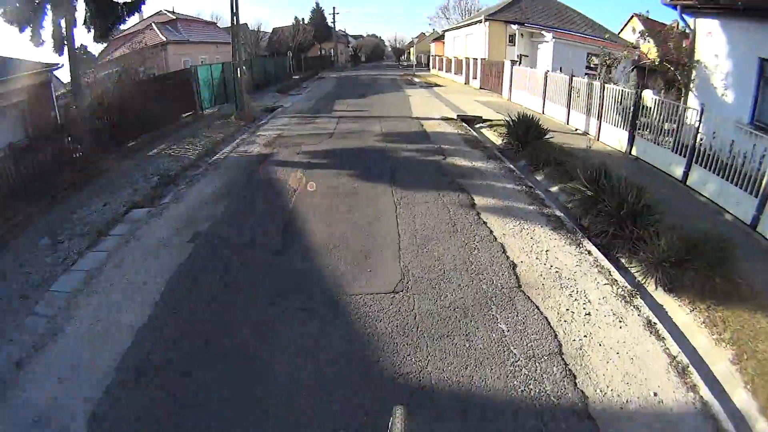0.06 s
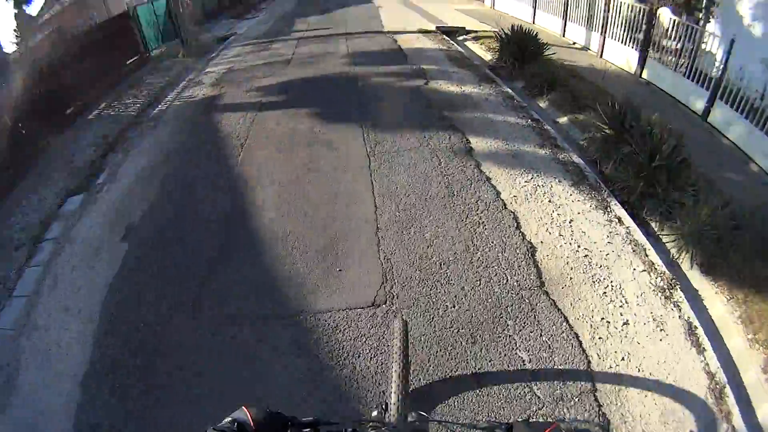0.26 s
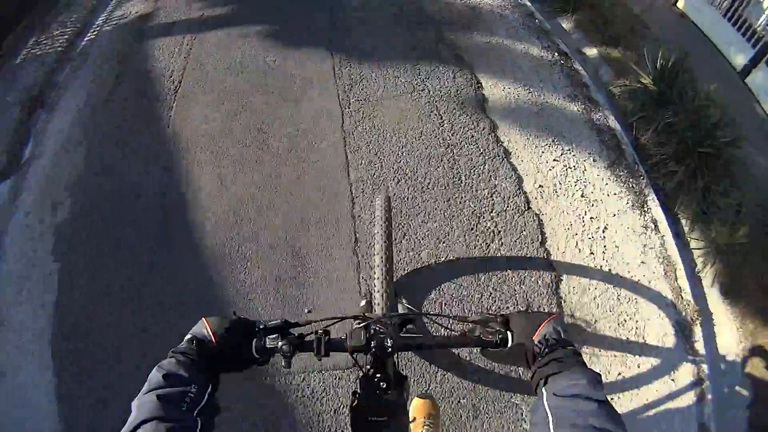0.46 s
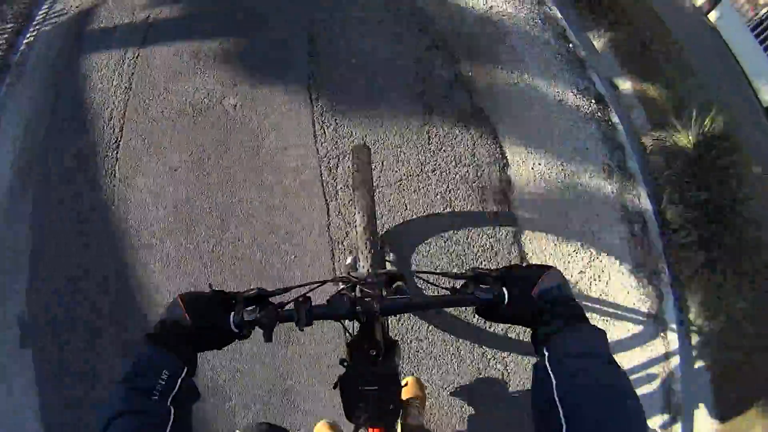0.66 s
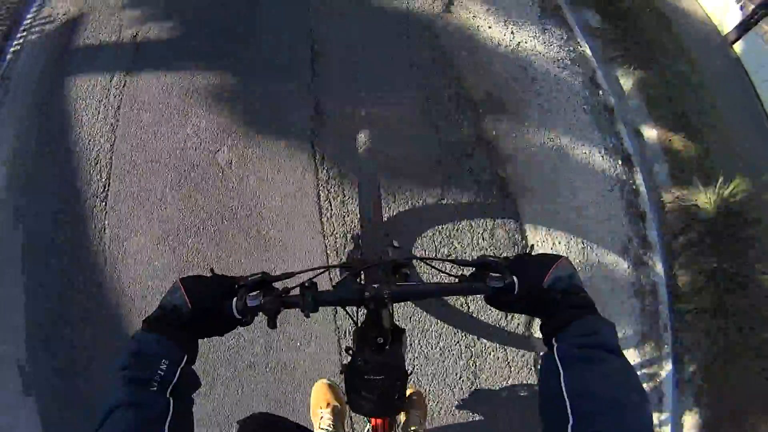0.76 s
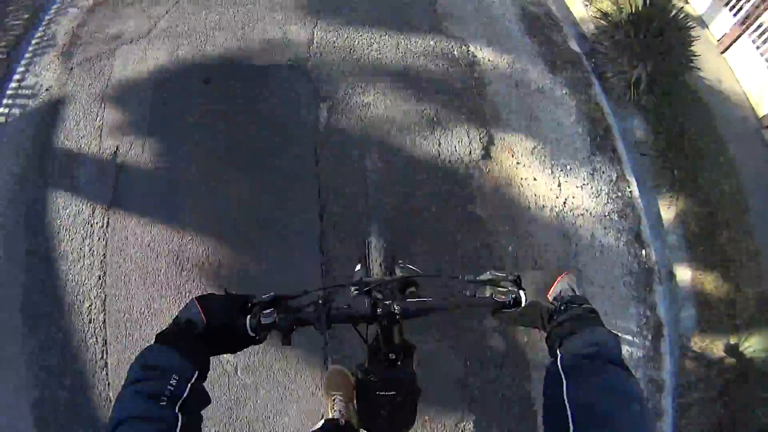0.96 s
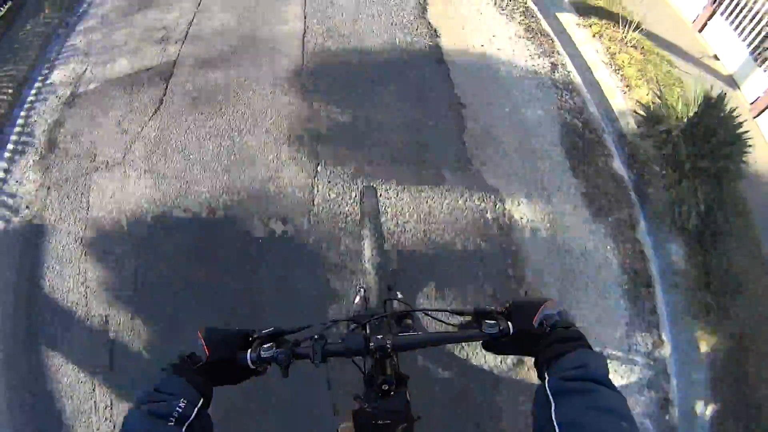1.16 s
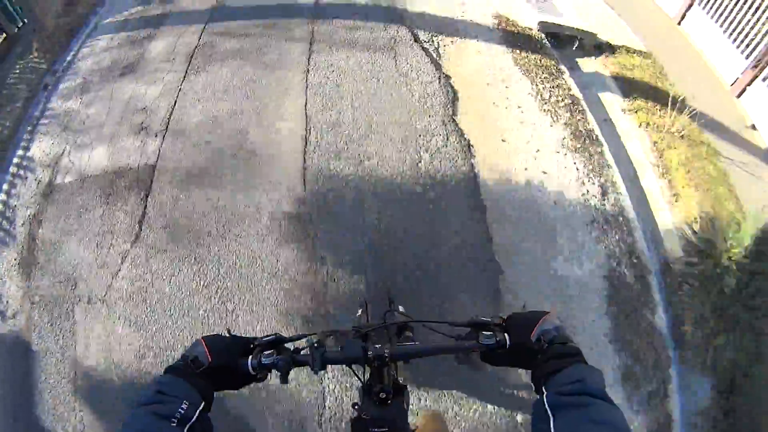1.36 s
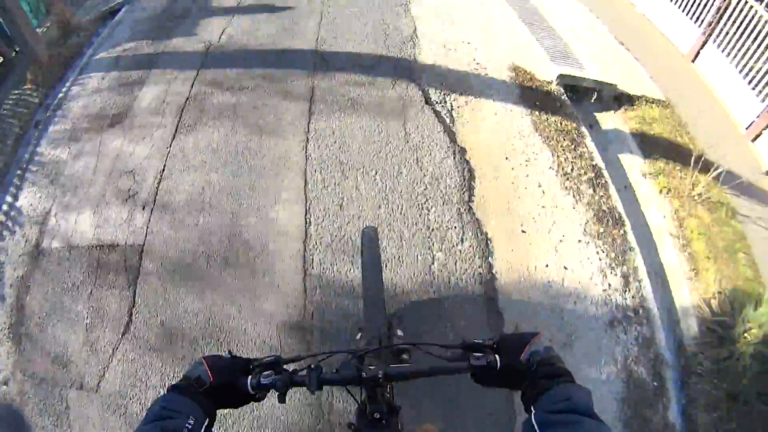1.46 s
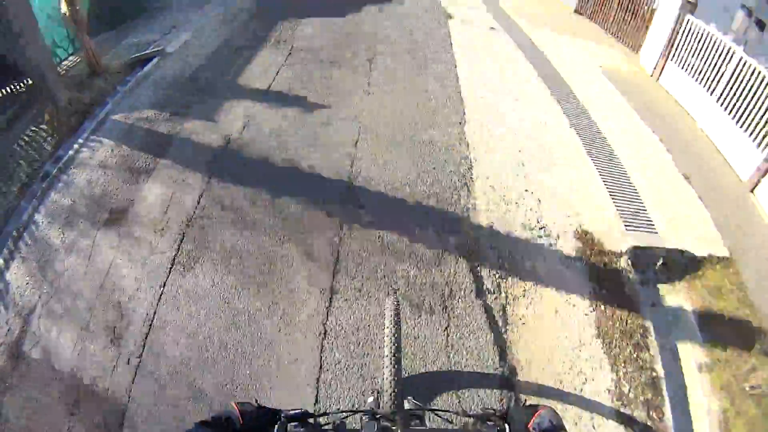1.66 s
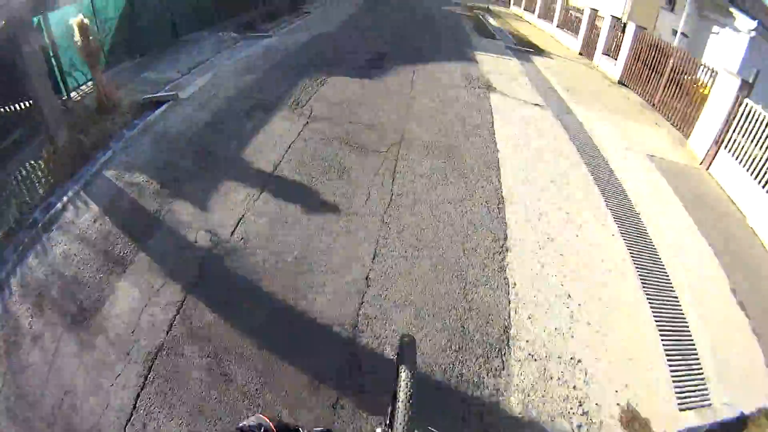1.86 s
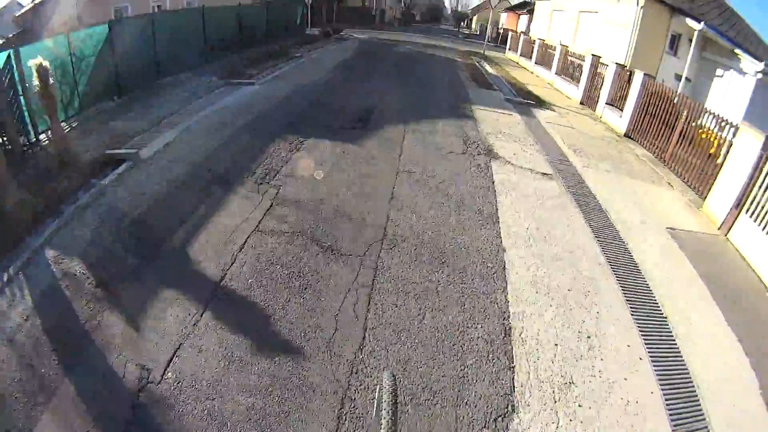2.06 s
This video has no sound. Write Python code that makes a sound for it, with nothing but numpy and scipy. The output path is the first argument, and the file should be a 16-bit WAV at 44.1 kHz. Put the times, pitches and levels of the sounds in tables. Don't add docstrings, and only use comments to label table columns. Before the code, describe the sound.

Bicycle tyres roll on asphalt with grainy hiss, heard from a helmet camera; loud mount rubbing and squeaks at first, then quieter road grit and stone ticks, and a sudden harsh crunch at the end.

```python
import sys
import numpy as np
from scipy import signal
from scipy.fft import rfft, irfft, next_fast_len
from scipy.io import wavfile
from scipy.ndimage import uniform_filter1d

SR = 44100
rng = np.random.default_rng(int(sys.argv[2]) if len(sys.argv) > 2 else 0)


def bounce(signal):
    frames = np.transpose(np.atleast_2d(signal))
    limited = np.clip(frames, -1, 1)
    pcm = np.round(limited * 32767).astype(np.int16)
    wavfile.write(sys.argv[1], SR, pcm)


def linear_from_db(decibels):
    return 10 ** (np.asarray(decibels, float) / 20)


N = 92301

# f/Hz, width/Hz, level/dB
PADDING_MODES = [(1020, 560, -11), (1513, 425, -0.5), (2434, 650, -1), (3224, 280, -14.5),
                 (5130, 1200, -5.5), (7000, 2030, -15)]
# f/Hz, width/Hz, level/dB
HOUSING_MODES = [(1390, 450, -10.5), (3020, 880, -1), (3394, 1300, -4.5), (5060, 1200, -9),
                 (7000, 3200, -14), (9000, 7800, -15)]


def level(x, db):
    return x * linear_from_db(db) / np.sqrt(np.mean(x ** 2))


def curve(table, column=1):
    rows = np.array(table)
    return np.interp(np.arange(N) / SR, rows[:, 0], rows[:, column])


def spectrum(table, hz, column=1):
    rows = np.array(table)
    return np.interp(np.log(hz), np.log(rows[:, 0]), rows[:, column])


def ring(x, hz, width_hz):
    return signal.lfilter(*signal.iirpeak(hz, hz / width_hz, fs=SR), x)


def body(x, modes):
    out = 0
    for k, (hz, width_hz, db) in enumerate(modes):
        mode = ring(ring(x, hz, width_hz), hz, 3 * width_hz)
        out = out + (-1) ** k * linear_from_db(db) * level(mode, 0)
    return out


def walk(rate_hz):
    hold = int(SR / rate_hz)
    steps = np.repeat(rng.standard_normal(N // 100)[:N // hold + 1], hold)
    return 0.79 * uniform_filter1d(uniform_filter1d(steps, hold), hold)[:N]


def clicks(per_s, scatter_db):
    chance, side, size = rng.random((3, N))
    return (chance < per_s / SR) * np.sign(side - 0.5) * linear_from_db(-scatter_db * np.log(1 - 0.995 * size))


def hits(table, length_s, modes, modes_db):
    strike, own_q = 5.0, 4
    out, n = np.zeros(N + 900), np.arange(900)
    for row, noise in zip(table, rng.standard_normal((len(table), 900))):
        burst = (noise + strike * (n == 0)) * np.exp(-n / SR / length_s)
        sound = body(burst, modes)
        sound = linear_from_db(modes_db) * sound / np.abs(sound).max()
        if len(row) > 2:
            own = ring(ring(burst, row[2], row[2] / own_q), row[2], 2 * row[2] / own_q)
            sound = sound + own / np.abs(own).max()
        i = int(row[0] * SR)
        out[i:i + 900] += linear_from_db(row[1]) * sound
    return out[:N]


def echo(x):
    decay_s = 0.002
    tail = rng.standard_normal(800) * np.exp(-np.arange(800) / SR / decay_s)
    return signal.fftconvolve(x, tail / np.sqrt(np.sum(tail ** 2)))[:N]


def ports(x, twin, wide=0.0):
    # f/Hz, left lead/rad, left minus right/dB, share of unrelated sound/1
    port_rows = [(110, .12, -.4, .012), (190, .4, -.3, .1), (330, 1.5, -.3, .55), (900, .7, 3.6, .3),
                 (1230, 1.0, 2.6, .03), (1650, .35, 1.8, .07), (3100, -.45, -.8, .35),
                 (4500, .2, -1.8, .35), (9000, .1, -.3, .42)]
    wide_hz = 4000
    size = next_fast_len(N + 4096)
    hz = np.arange(size // 2 + 1) * SR / size + 1
    lead_rad, diff_db, share = (spectrum(port_rows, hz, k) for k in (1, 2, 3))
    share = np.clip(share + wide * hz ** 2 / (hz ** 2 + wide_hz ** 2), 0, 1)
    common = rfft(x, size) * np.sqrt(1 - share / 2)
    apart = rfft(twin, size) * np.sqrt(share / 2)
    sides = []
    for s in (1, -1):
        turned = (common + s * apart) * linear_from_db(s * diff_db / 2) * np.exp(0.5j * s * lead_rad)
        sides.append(irfft(turned, size)[:N])
    return np.array(sides)


def air():
    # f/Hz, density/dB per Hz
    density = [(88, -34), (150, -22), (215, -6), (343, -13.5), (704, -17), (1340, 2.5), (2390, -8.5),
               (3020, -5), (11000, -18), (14300, -56), (22000, -120)]
    flicker_db = 4
    out, swell = 0, walk(17.8)
    for hz in 150 * 2 ** np.arange(0, 6.3, 1 / 3):
        db = spectrum(density, hz) + 10 * np.log10(hz) + 0.9 * swell + flicker_db * walk(31.1)
        band = ring(ring(rng.standard_normal(N), hz, hz / 3), hz, hz / 3)
        out = out + linear_from_db(db) * level(band, 0)
    return level(out, -52.5)


def whine():
    tone = ring(rng.standard_normal(N), 6830, 60)
    return level(tone, -72) * np.array([[1], [-1]])


def rumble():
    # f/Hz, width/Hz, level/dB
    low_modes = [(27.6, 17, -59.5), (56.1, 5.8, -71.5), (88, 22, -62), (114.7, 19.5, -62),
                 (161.8, 21.6, -64.5), (341.3, 27, -66.5)]
    # t/s, level/dB
    roughness = [(0.0, -50.5), (0.23, -53.5), (1.64, -57.5), (1.66, -61), (1.86, -55), (1.88, -63),
                 (1.96, -60), (1.99, -61), (2.09, -50)]
    rough_db = curve(roughness)
    modes = [level(ring(ring(rng.standard_normal(N), hz, w), hz, 2 * w), db) for hz, w, db in low_modes]
    return modes[0] + modes[1] + linear_from_db(rough_db - rough_db.mean()) * sum(modes[2:])


def bumps():
    # centre t/s, half-length/s, peak level/dB, f/Hz
    swings = [(.03, 0.071, -45.5, 90), (0.119, 0.045, -51, 107), (.2, 0.059, -53.5, 105),
              (0.348, 0.025, -54, 95), (0.477, 0.031, -51, 30), (0.567, .03, -47, 33),
              (0.732, 0.018, -46, 35.4), (0.762, 0.023, -53.5, 124), (1.09, 0.031, -53.5, 96),
              (1.198, 0.054, -50.5, 33), (1.547, 0.064, -49, 27.3), (1.669, 0.023, -51.5, 26.6),
              (1.843, 0.018, -53, 104), (1.31, 0.047, -56, 59.5), (1.965, 0.051, -52, 27.3),
              (2.051, 0.029, -46.5, 28), (2.02, 0.033, -52.5, 100)]
    t, out = np.arange(N) / SR, 0
    for at, half, db, hz in swings:
        swell = np.exp(-((t - at) / half) ** 2)
        out = out + linear_from_db(db) * swell * np.sin(2 * np.pi * hz * (t - at))
    return out


def rub():
    # t/s, level/dB, upper ring re lower/dB
    motion = [(0.0, -33.5, -8), (0.07, -33, -5), (0.13, -31.5, -6.5), (0.28, -34.5, -2), (0.32, -33, -4),
              (0.58, -44.5, -0.5), (0.59, -42.5, -5), (0.62, -43, -6.5), (0.84, -50, -3), (0.96, -53.5, -1),
              (1.03, -47, -4), (1.17, -49, 1.5), (1.84, -51.5, -6.5), (1.97, -37.5, -2), (2.0, -39.5, 2),
              (2.02, -29, -0.5), (2.04, -31.5, -13), (2.09, -36.5, -0.5)]
    # f/Hz, width/Hz, level/dB
    lower_modes = [(790, 72, -11.5), (946, 70, -10), (1172, 80, -8), (1285, 27.5, -5), (1328, 8.7, -2.5),
                   (1401.3, 130, 1), (575, 56, -15)]
    # f/Hz, width/Hz, level/dB
    upper_modes = [(1437, 64, 5), (1544, 44, -1), (1660, 20, -5), (1766, 97, -1.5), (2073, 74, -11.5),
                   (2040, 21, -23), (2876, 49, -11.5)]
    rustle_hz, rustle_width_hz, follow = 380, 500, 0.57
    slips = clicks(per_s=1500, scatter_db=1.5) * linear_from_db(0.6 * walk(40.34))
    lower = level(body(slips, lower_modes), -5.0)
    upper = level(body(slips, upper_modes), 0.25)
    drone = lower + linear_from_db(curve(motion, column=2)) * upper
    rustle = ring(ring(rng.standard_normal(N), rustle_hz, rustle_width_hz), rustle_hz, rustle_width_hz)
    return linear_from_db(curve(motion)) * drone + level(rustle * linear_from_db(follow * curve(motion)), -59)


def squeak():
    # start t/s, length/s, level/dB, f/Hz, glide/(Hz/s)
    bursts = [(0.014, 0.028, -43, 2545, -3), (0.041, 0.032, -45, 2560, -9), (0.072, 0.026, -47, 2510, 0),
              (0.108, 0.043, -39.5, 2550, 0), (0.158, 0.042, -40, 2511, 0), (0.179, 0.074, -40.5, 2545, 0),
              (0.247, 0.084, -49, 2520, 7), (0.102, 0.038, -41, 1555, -5), (0.143, 0.1, -42, 1560, 300),
              (0.172, 0.071, -38.5, 1255, 0), (0.2, 0.046, -39.5, 1590, 304),
              (0.201, 0.072, -42.5, 1330, -300), (0.246, 0.054, -32, 1345, -2),
              (0.304, 0.026, -42, 1330, -3), (0.25, .05, -43, 1540, -500), (0.406, 0.031, -40, 1340, -500),
              (0.473, 0.075, -46, 1340, 294), (0.427, 0.15, -60.5, 575, -9),
              (0.575, 0.043, -40.5, 1310, 3000), (0.526, .03, -47, 3030, 0), (0.834, 0.022, -44.5, 1350, 0),
              (1.884, 0.024, -46.5, 1450, 0), (1.933, 0.022, -41, 1340, 17), (1.95, 0.046, -43.5, 1340, 0)]
    edge_s = 0.008
    t, out = np.arange(N) / SR, 0
    waver_s = np.cumsum(1 + 0.007 * walk(69.5)) / SR
    flutter, grain = linear_from_db(1.5 * walk(120)), walk(350)
    for at, span, db, hz, glide in bursts:
        rough = 0.9 * (hz / 2550) ** 2
        size = np.roll(flutter * (1 + rough * grain), int(1000 * hz) % N) * np.sqrt(2 / (1 + rough ** 2))
        shape = np.clip(np.minimum(t - at, at + span - t) / edge_s, 0, 1)
        cycles = hz * waver_s + glide * (t - at) ** 2 / 2
        out = out + linear_from_db(db) * size * shape * np.sin(2 * np.pi * cycles)
    return out


def crunch():
    # centre t/s, half-length/s
    swells = [
        (.085, .02),
        (.2, .07),
        (.335, .055),
        (.635, .012),
        (.703, .022),
        (.753, .01),
        (2.03, .035),
        (2.062, .018),
    ]
    swell_db = [-37.5, -48.5, -38.5, -46, -45.5, -42.5, -34, -35.5]
    t = np.arange(N) / SR
    swell = sum(linear_from_db(db) * np.exp(-((t - at) / half) ** 2) for (at, half), db in zip(swells, swell_db))
    grains = clicks(per_s=2700, scatter_db=1) * linear_from_db(1.0 * walk(110))
    return swell * level(body(grains, PADDING_MODES), 0)


def cracks():
    # t/s, peak level/dB
    grains = [(.3013, -30), (.3305, -23), (.341, -29), (.348, -30), (.3515, -27), (.3645, -28),
              (.3715, -28), (.379, -28), (.690, -33), (.709, -31), (1.723, -38), (1.377, -37),
              (1.9905, -30), (1.994, -30), (2.006, -26), (2.0145, -25), (2.0195, -21), (2.029, -22),
              (2.038, -21), (2.048, -22), (2.0535, -24), (2.0595, -26), (2.064, -27), (2.0685, -22)]
    return linear_from_db(1) * hits(grains, 0.0016, PADDING_MODES, 0)


def grit():
    # t/s, level/dB
    coarseness = [(0, -4.5), (.3, 0), (.45, 2.5), (.58, 0.5), (.66, 0.5), (.9, -2.5), (1.3, -2), (1.55, -2),
                  (1.7, -6), (1.95, -3.5), (2.09, 1)]
    shared = clicks(per_s=800, scatter_db=3.6)
    patches = linear_from_db(2.0 * walk(24.83) + curve(coarseness))
    out = 0
    for k, (hz, width_hz, db) in enumerate(HOUSING_MODES):
        own = np.roll(shared, 9001 * k + 5003)
        mode = ring(ring(0.15 * shared + own, hz, width_hz), hz, width_hz)
        out = out + linear_from_db(db) * level(mode, 0)
    return level(patches * out, -49.5)


def ticks():
    # t/s, peak level/dB, f/Hz
    stones = [(0.0225, -31, 3680), (0.434, -33, 2930), (0.4478, -21, 3300), (0.5716, -35, 2900),
              (0.751, -36, 3180), (0.9737, -38, 3100), (1.0833, -36, 3140), (1.1724, -37, 3100),
              (1.261, -29, 3300), (1.2653, -32, 3370), (1.296, -36, 3600), (1.3445, -29, 3240),
              (1.3654, -38, 3090), (1.3765, -29, 3200), (1.48, -29, 3000), (1.4927, -35, 2940),
              (1.5793, -38, 2900), (1.9068, -27, 3200), (1.9084, -21, 3600), (1.9164, -32, 3000)]
    # t/s, peak level/dB, f/Hz
    fine = [(.077, -43, 6200), (.395, -50, 9100), (.555, -41.5, 8400), (.585, -41, 6100),
            (.928, -41.5, 9000), (1.262, -42, 5460), (1.057, -49, 7000), (1.067, -40, 8700),
            (1.116, -44.5, 8200), (1.39, -45, 7950), (1.51, -49, 5460), (1.545, -51, 9600),
            (1.9085, -40, 4900), (.4475, -37, 4140), (.448, -51, 9500), (.71, -34.5, 6140),
            (.273, -38, 5860)]
    coarse_ticks = linear_from_db(-4) * hits(stones, 0.0006, HOUSING_MODES[1:4], -12)
    return coarse_ticks + hits(fine, 0.0067, HOUSING_MODES[1:], -32)


def scene():
    near = squeak() + ticks()
    padding = crunch() + cracks()
    spread, twin = (rub() + grit() + rumble() + air() for _ in range(2))
    mount_and_road = ports(near + spread, echo(near) + twin)
    return bumps() + mount_and_road + ports(padding, echo(padding), wide=0.5) + whine()


def low_pass(x):
    return signal.sosfilt(signal.butter(12, 12260, fs=SR, output="sos"), x)


def record(dry):
    top_cut = signal.ellip(12, 0.3, 80, 11150, fs=SR, output="sos")
    mix = signal.sosfilt(top_cut, dry)
    return low_pass(mix)


dry = scene()
out = record(dry)
bounce(out)
```